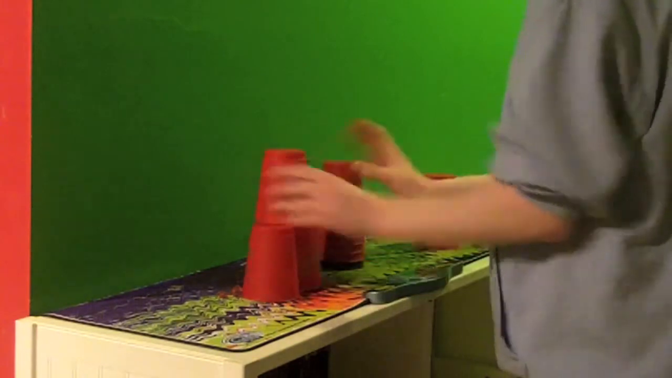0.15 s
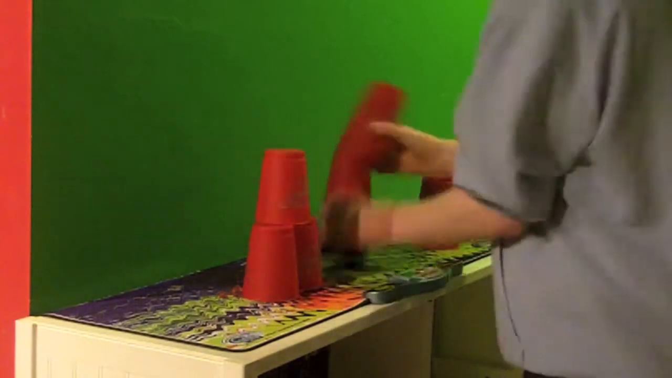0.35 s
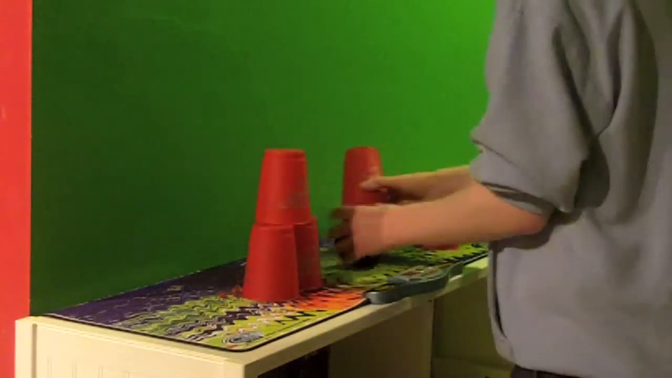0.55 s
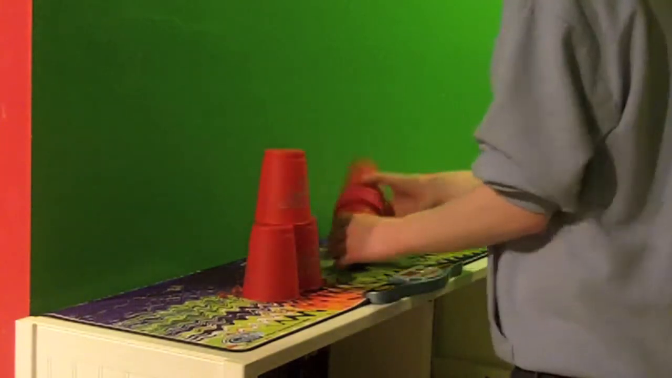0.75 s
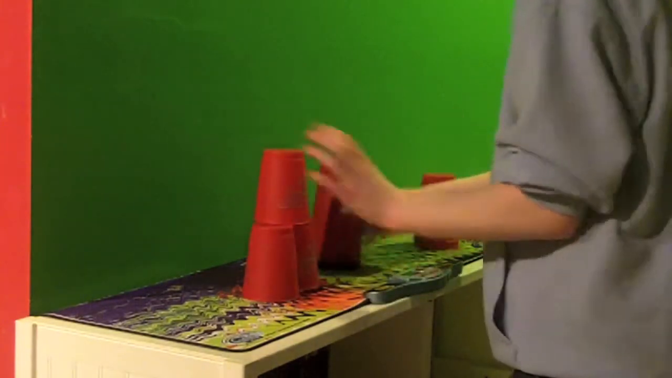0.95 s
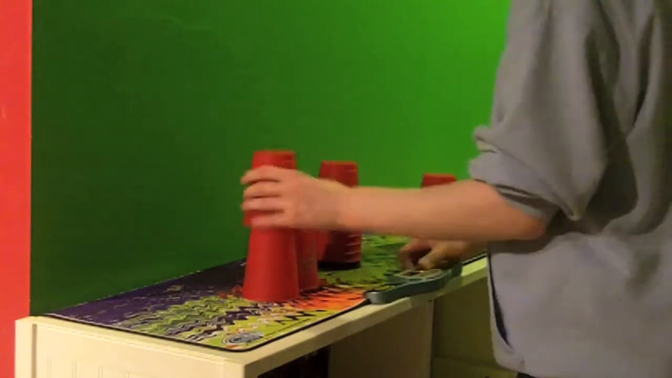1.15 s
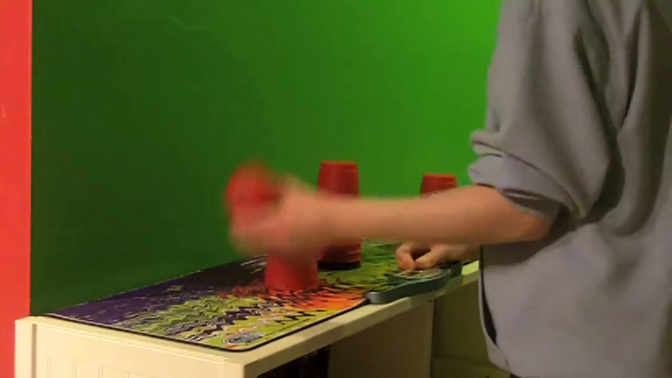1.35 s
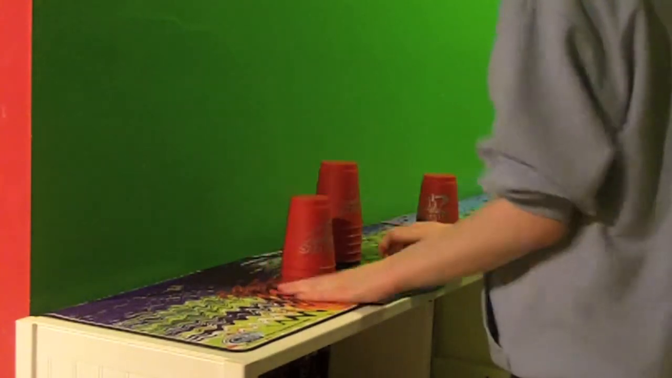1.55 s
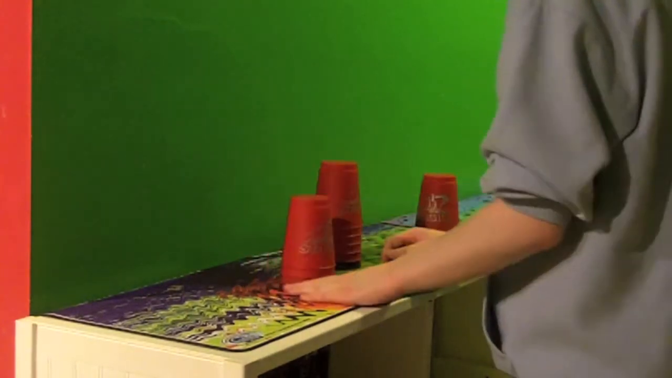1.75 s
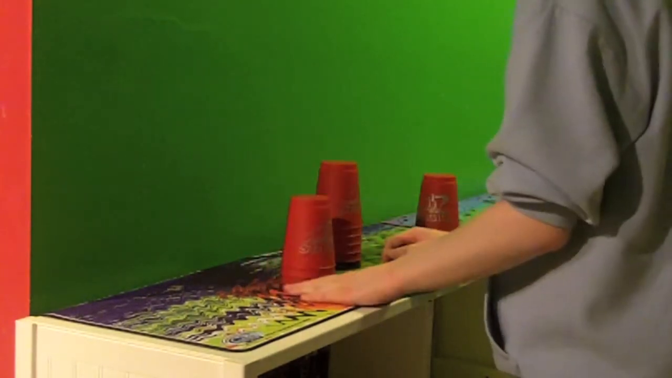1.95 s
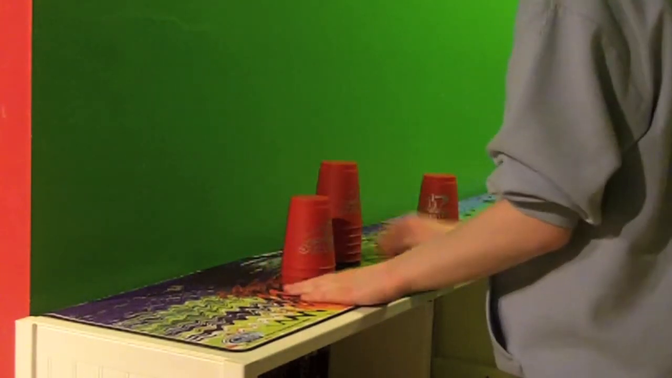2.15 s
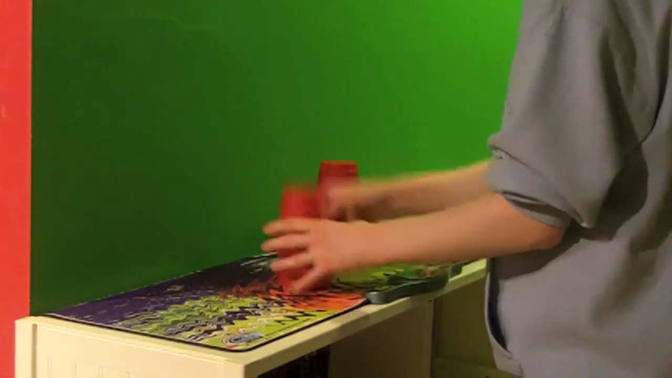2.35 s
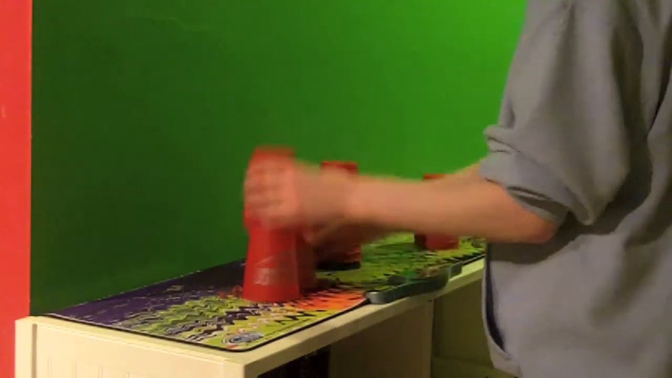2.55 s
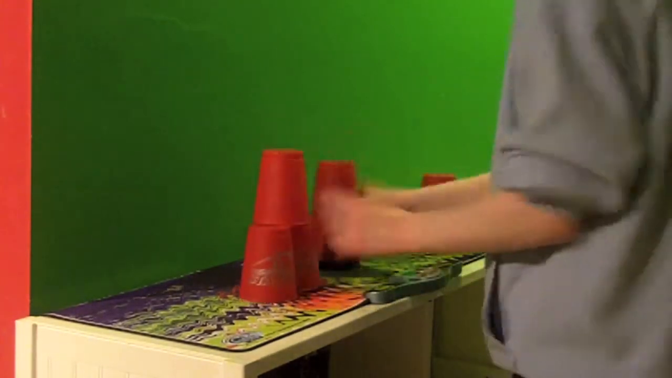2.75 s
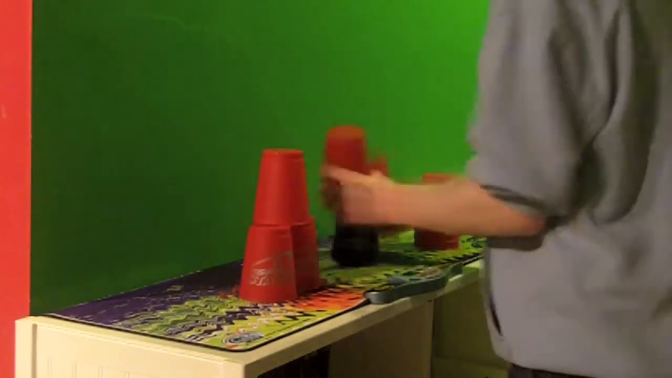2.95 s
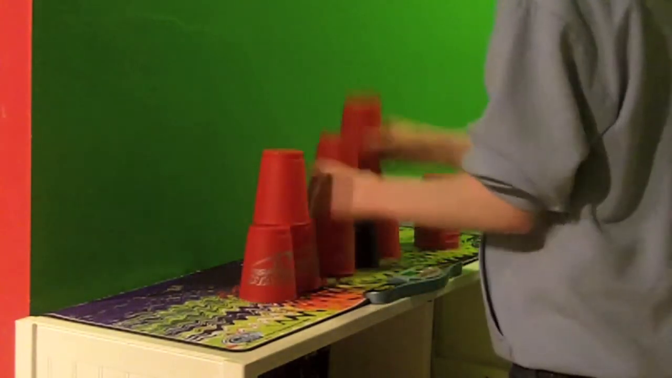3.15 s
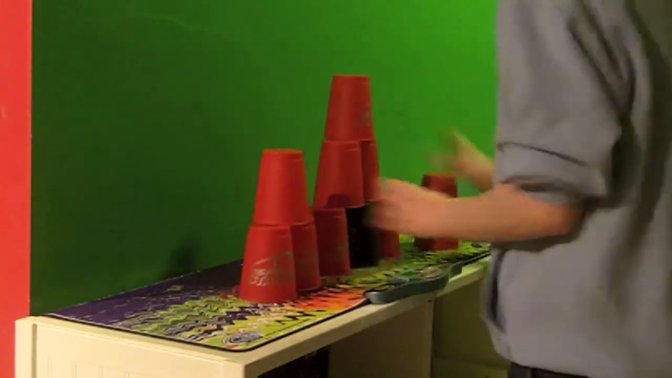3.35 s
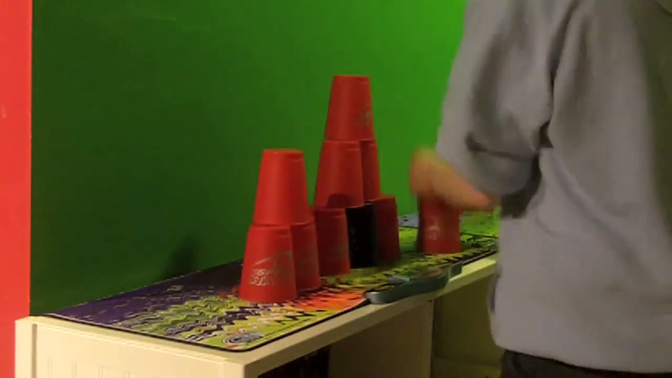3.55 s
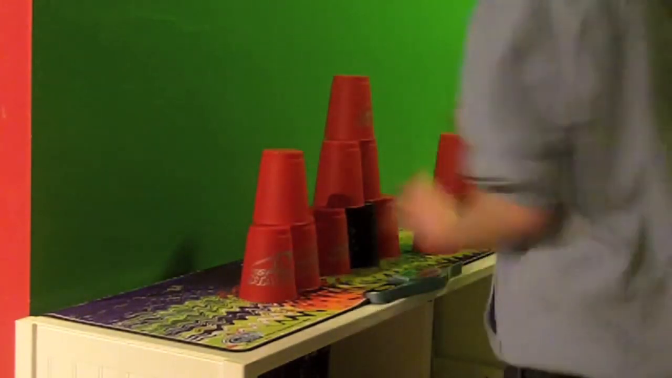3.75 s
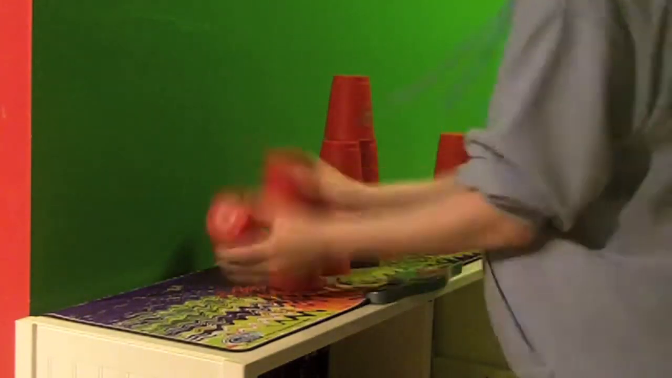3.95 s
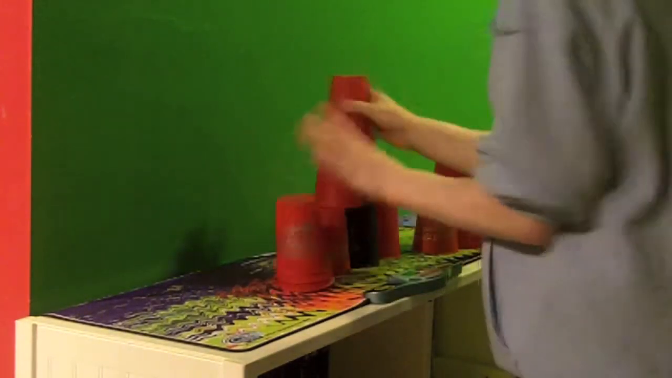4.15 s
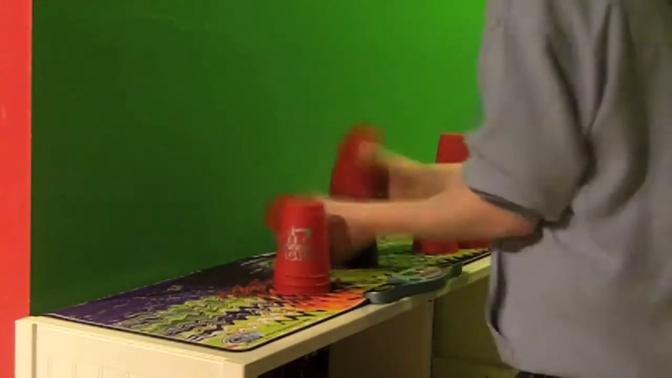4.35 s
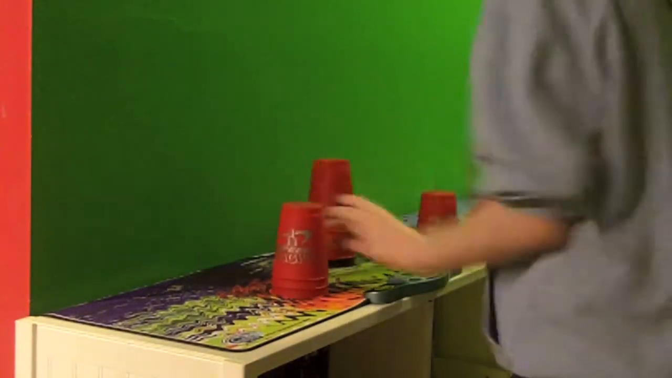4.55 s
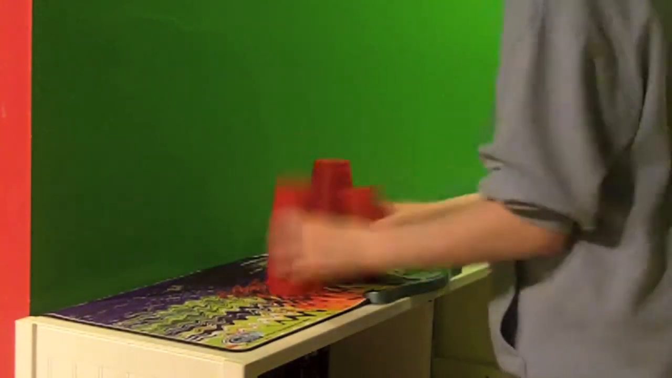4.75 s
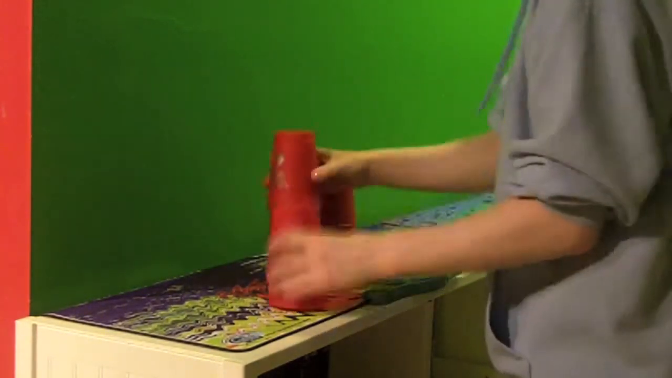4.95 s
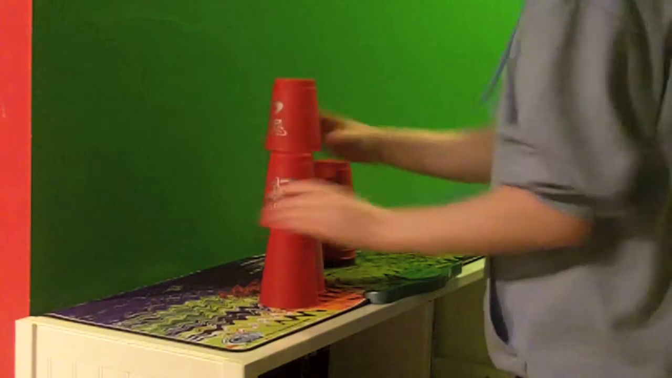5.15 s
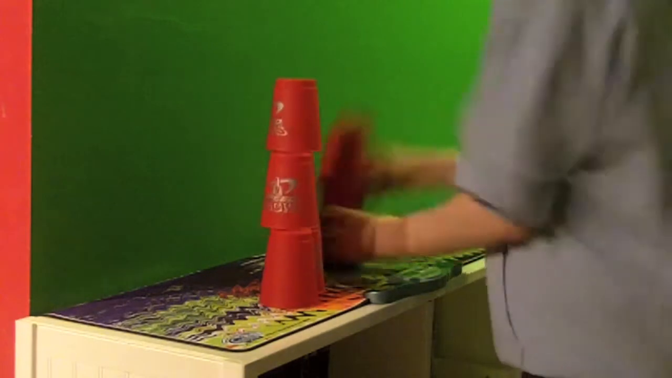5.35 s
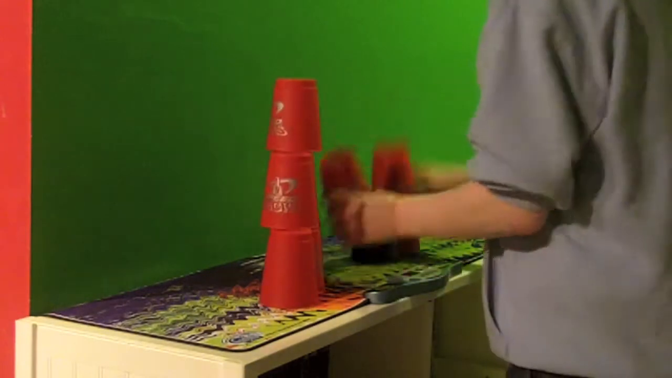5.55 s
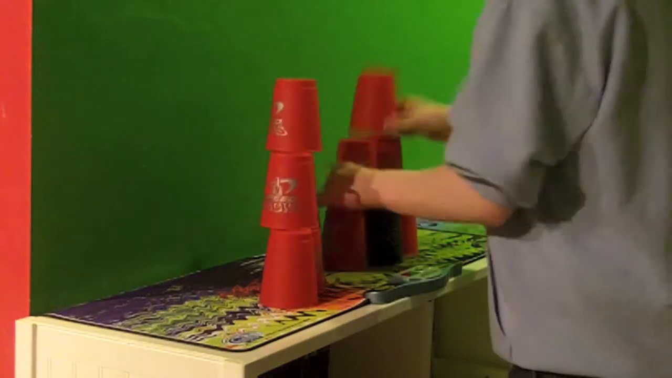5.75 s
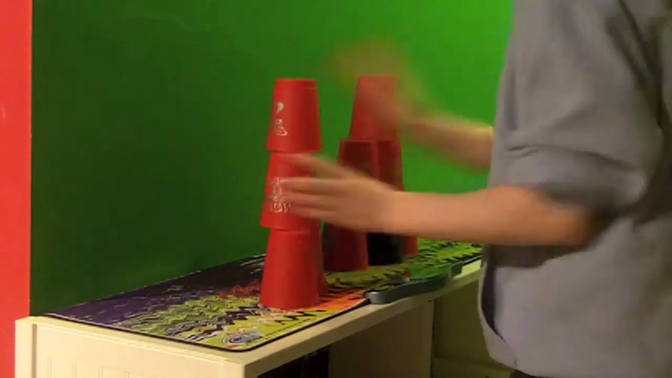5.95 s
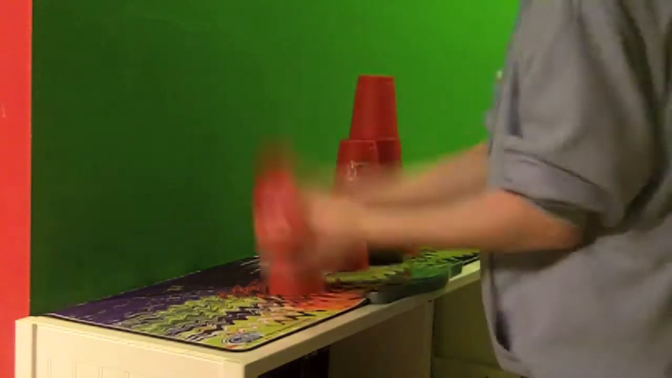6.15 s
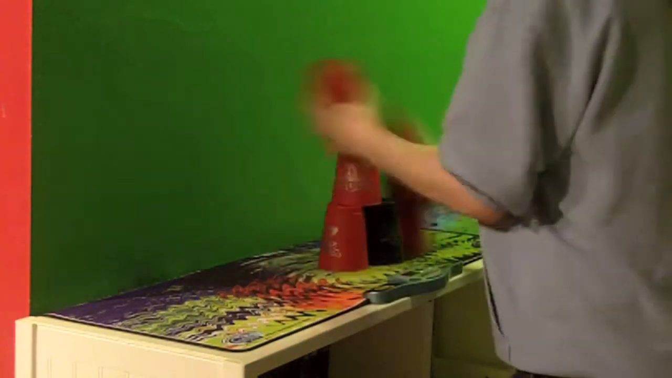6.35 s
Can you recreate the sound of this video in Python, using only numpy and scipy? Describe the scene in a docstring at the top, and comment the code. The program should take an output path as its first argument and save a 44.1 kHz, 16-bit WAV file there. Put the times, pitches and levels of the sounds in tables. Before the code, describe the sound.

Lightweight plastic cups are speed-stacked on a cabinet with a soft mat. Hollow pops and quick clacks begin at once, with short rubbing slides as cups nest. Hands bump the top dully, then there is a near-silent pause around two seconds before denser clatter resumes and runs to the end. Close, dry small room, mono camera microphone, faint low rumble.

```python
"""A short scrape of plastic and a burst of hollow pops come first: light cups are stacked fast on a matted cabinet top.
Each contact is a rattle of touches exciting resonators: the top thuds, the cup's air pops, its shell clacks, its rim ticks.
Nested cups rustle as they slide, by shaped noise, and the air gap between them rings as a gliding narrow band.
Hands brush and tick on the plastic; now and then they come down and the cabinet sways by a decaying sine.
A small room adds decaying noise as reverberation; under it lie a low rumble and a thin electrical whine."""
import sys
import numpy as np
from scipy import signal
from scipy.fft import rfft, irfft
from scipy.io import wavfile
from scipy.ndimage import uniform_filter1d

SR = 44100
rng = np.random.default_rng(int(sys.argv[2]) if len(sys.argv) > 2 else 0)


def store_pcm(level_fs):
    """Save levels as 16-bit WAV."""
    pcm = np.round(np.clip(level_fs, -1, 1) * 32767).astype(np.int16)
    wavfile.write(sys.argv[1], SR, np.atleast_2d(pcm).T)


N = 286209   # samples in the scene

# Noise of the still room. Each row: frequency in Hz, relative level in dB per Hz.
ROOM_AIR_SPECTRUM = [(25, -2), (45, -6), (70, -26), (130, -31), (250, -25.5), (450, -35), (900, -42),
                     (3000, -50.5), (8000, -56.5), (15000, -55)]
# Reverberation of the room. Each row: frequency in Hz, time to fall by 60 dB in s.
ROOM_DECAY = [(100, 0.33), (400, 0.26), (1000, 0.33), (2000, 0.25), (6000, 0.2), (14000, 0.068)]
# Sleeves and fingers on the move. Each row: time in seconds, rustle level in dB.
HANDLING_LEVELS = [(1.6, -53), (1.75, -70), (2.3, -93), (2.38, -59), (3.1, -50), (3.35, -59), (3.85, -58),
                   (3.95, -42), (4.5, -46), (5.0, -56.5), (5.28, -63.5), (5.4, -51.5)]
# Plastic rubbing on plastic. Each row: frequency in Hz, relative level in dB per Hz.
RUB_SPECTRUM = [(120, -15.5), (300, -15), (600, 13.5), (1600, 7), (3000, 0.5), (4300, 2), (6600, 5),
                (8200, -2), (10000, -9), (15000, -29)]
# Hands come down and set the cabinet swaying. Each row: start in seconds, level in dB.
HAND_PRESSES = [(0.463, -33), (1.145, -38), (1.575, -30), (2.201, -45)]
# Deep modes of the cabinet's panels. Each row: frequency in Hz, relative level in dB.
PANEL_MODES = [(50, 1), (70, 0.5), (122, -7.5), (151, 3.5), (180, -0.5), (215, 4)]
# Modes of the cabinet top under the mat. Each row: frequency in Hz, relative level in dB.
TOP_MODES = [(255, -11), (289, -5), (336, 0), (390, -7), (441, -2.5), (480, 3.5), (530, 5.5)]
# Modes of the air cavity and wall of the cups. Each row: frequency in Hz, relative level in dB.
CUP_MODES = [(600, 3), (641, 4.5), (700, -1), (759, -4), (813, -4.5), (883, 1), (922, -5.5), (985, 1),
             (1044, 4), (1120, 3.5), (1200, 0.5), (1280, 0), (1420, -8.5), (1500, -8), (1582, -10.5),
             (1675, -7), (1755, -15.5), (1825, -7), (1927, -8.5), (2080, -2), (2229, 1), (2400, 5.5),
             (2600, 4)]
# Crowded upper modes of the rim. Each row: frequency in Hz, relative level in dB per Hz.
RIM_SPECTRUM = [(1800, -12.5), (2700, 5.5), (4300, 3), (6600, 5), (8000, -1.5), (10000, -10),
                (12500, -24.5), (15000, -23)]
# The air between two nested cups rings, sinking as they part and rising as they close.
# Each row: start in seconds, length in s, level at the highest pitch in dB, start pitch in Hz, end pitch in Hz.
GAP_GLIDES = [(0.622, 0.063, -28, 1505, 1143), (0.85, .06, -28, 1369, 1030),
              (1.272, 0.038, -23.5, 1870, 1686), (1.42, 0.01, -20.5, 1687, 1830),
              (2.427, 0.037, -41, 1746, 1400), (2.848, 0.041, -37, 1730, 1285),
              (3.495, 0.031, -32, 1750, 1440), (4.015, 0.028, -23, 1190, 1900),
              (4.363, 0.012, -22, 1575, 1840), (4.51, 0.014, -25.5, 1660, 1820),
              (4.883, 0.011, -32.5, 1550, 1740), (6.098, .024, -59, 1360, 1830)]
# Cups are drawn along each other. Each row: start in seconds, end in seconds, rustle level in dB.
DRAWN_CUPS = [(0, 0.038, -42.5), (0.286, 0.338, -38), (0.349, 0.405, -42), (0.681, 0.78, -39.5),
              (1.141, 1.259, -34.5), (2.132, 2.175, -52), (2.341, 2.413, -46.5), (2.492, 2.58, -38),
              (2.803, 2.865, -39), (3.442, 3.485, -42), (3.898, 3.981, -38), (4.163, 4.244, -49),
              (4.513, 4.572, -55), (4.796, 4.95, -57), (4.964, 5.025, -39), (5.39, 5.431, -46.5),
              (6.272, 6.394, -39)]
# Fingers take hold of a stack and jostle it.
# Each row: start in seconds, hollow pop in dB, hardness (clack over pop) in dB.
GRABBED_STACKS = [(.253, -30.5, -15), (.383, -27.5, -14), (.6893, -41, -8.5), (.8098, -43, -1),
                  (.927, -36.5, -18), (1.438, -32, -7), (1.5586, -29.5, -15), (1.846, -71, -6),
                  (2.178, -52, -11), (2.215, -53, -23), (2.3534, -37.5, -17), (2.433, -44.5, -10),
                  (2.8495, -34, -5.5), (2.8966, -32.5, -10.5), (2.946, -51, 4), (3.4178, -27.5, -14.5),
                  (4.399, -34.5, -7), (4.456, -29.5, -14), (4.7363, -31.5, -13), (5.0204, -35.5, -15),
                  (5.309, -36, -14), (5.3657, -31.5, -15), (5.443, -29, -12.5), (5.685, -28.5, -20),
                  (6.313, -28, -11)]
# A cup is set down on the mat or on other cups.
# Each row: start in seconds, rattle length in s, hollow pop in dB, pop pitch in Hz, hardness (clack over pop) in dB.
CUP_LANDINGS = [(0.019, 0.011, -36, 596, -13), (0.038, 0.02, -16.5, 710, -24.5),
                (0.0595, 0.01, -22.5, 666, -34), (0.112, 0, -10, 863, -10), (1.1172, .032, -23, 830, -17),
                (1.155, 0.047, -22.5, 850, -24), (2.568, 0.027, -17, 730, -27),
                (2.6166, 0.0091, -12, 870, -13), (2.623, 0.016, -12, 860, -20.5),
                (2.781, 0.024, -26, 746, -12.5), (3.002, 0.0067, -18, 746, -15),
                (3.0955, 0.018, -21.5, 730, -13.5), (3.1187, 0.0013, -19.5, 700, -29),
                (3.1493, 0.019, -21, 890, -15.5), (3.184, 0.029, -18, 830, -27.5),
                (3.2332, 0.016, -9, 730, -13), (3.245, 0.028, -10, 940, -14.5),
                (3.6059, 0.0035, -9, 843, -26.5), (3.6178, .002, -9.5, 730, -41),
                (3.663, 0.00056, -9.5, 910, -15.5), (3.8976, 0.0037, -27.5, 860, -19),
                (3.9086, .015, -18, 835, -22), (3.965, .015, -20.5, 815, -18),
                (4.1617, 0.017, -23.5, 960, -13.5), (4.1796, .002, -16.5, 930, -25),
                (4.235, 0.011, -15.5, 940, -9.5), (4.5515, .019, -25, 830, -10),
                (4.6705, 0.019, -20.5, 820, -7), (4.9667, .028, -21, 724, -18.5),
                (5.0832, .016, -16, 810, -22), (5.1167, 0, -9.5, 1080, -13), (5.54, .011, -13, 710, -20),
                (5.7111, 0.006, -17.5, 854, -21), (5.745, 0.036, -19, 935, -23),
                (5.792, 0.012, -12.5, 746, -15), (5.8197, 0.0057, -7.5, 870, -15.5),
                (6.021, 0.0043, -20, 910, -18), (6.029, .012, -9.5, 840, -17)]
# A cup slides into another and rams home.
# Each row: start in seconds, rattle length in s, shell clack in dB, cabinet thud in dB, rustle of the slide in dB.
CUP_NESTINGS = [(0.3312, 0.014, -26.5, -34, -43), (.418, 0, -18, -27.5, -29),
                (0.4483, 0.008, -24.5, -25.5, -53), (0.471, 0.0000086, -20, -18.5, -50),
                (0.6244, 0.0064, -30, -42, -71), (0.852, 0.018, -34, -35.5, -58),
                (.973, 0.0053, -18.5, -26.5, -49), (1.204, 0.0079, -29, -28.5, -55),
                (1.274, 0.0017, -13.5, -35, -56), (1.4209, 0.0053, -34.5, -49, -66),
                (1.4982, 0.0027, -29.5, -26, -47), (1.505, 0, -16, -34.5, -56),
                (3.016, .003, -22.5, -29, -54), (3.5015, 0.02, -38, -33.5, -56),
                (3.608, .008, -21, -48, -80), (4.0027, 0, -32.5, -29, -42), (4.03, 0.011, -27.5, -30, -40),
                (4.054, .009, -24.5, -33, -40), (4.077, .009, -36, -32, -28),
                (4.2563, .0016, -16.5, -42, -38), (4.27, 0.016, -31, -17.5, -53),
                (4.2912, 0.0017, -17, -24.5, -48), (4.3655, 0, -24, -40, -62),
                (4.515, .001, -37.5, -26.5, -44), (4.582, 0.0059, -21, -30.5, -37),
                (6.0824, 0.052, -34, -23, -56), (6.1198, 0, -12, -21, -24.5), (6.139, 0, -27, -23, -48),
                (6.1408, 0.0086, -15.5, -34, -34), (6.2586, 0.0056, -20, -27, -41),
                (6.37, 0.048, -27, -27, -38), (6.405, 0.009, -39.5, -18, -36.5),
                (6.432, 0.018, -25.5, -33, -30.5), (6.467, 0.00071, -17, -29.5, -42)]

HIT_SIZE = 5292   # samples given to one contact
CONTACTS_PER_S = 450   # touches in a rattle
# Times to fall by 60 dB, in s
TOP_T60_S, PANEL_T60_S, POP_T60_S, CLACK_T60_S, TICK_T60_S = 0.094, 0.18, 0.084, 0.04, 0.046

# Fingertip ticks: rate, then level and spread in dB relative to the handling rustle
TICKS_PER_S, TICKS_DB, TICKS_SPREAD_DB = 66, -6.5, 9
# The air gap rings lower while a cup is pushed in
SLIDE_S, SLIDE_GAP_HZ, DRAW_GAP_HZ = 0.075, 2940, 6940
GRAB_RATTLE_S, GRAB_POP_HZ = 0.017, 783

# A landing's thud grows less than its pop: dB at a pop of 0 dB, dB per dB, most dB over the pop
THUD_DB, THUD_SHARE, THUD_MOST_DB = -10.5, 0.67, 1
THUD_DB_PER_OCTAVE = -7   # a cup flat on the mat pops lower and thuds more than one set on other cups
# Tick in dB at a clack of 0 dB, then dB per dB
LANDING_CLACK_HZ, LANDING_TICK_DB, LANDING_TICK_SHARE = 1797, -7.0, 0.78
CLACK_SLOPE = -0.44   # octaves of clack per octave of pop: cups set high on a stack clack lower
NEST_POP_HZ, NEST_CLACK_HZ = 807, 1635
NEST_POP_DB, NEST_POP_SHARE = 3.0, 0.53   # pop over a blend of thud and clack; the thud's share in it
NEST_TICK_DB, NEST_TICK_SHARE = -10.5, 0.83   # tick in dB at a clack of 0 dB, dB per dB


def from_db(db):
    """Level to amplitude: twenty decibels are a factor of ten."""
    return 10 ** (np.asarray(db) / 20)


def rms_one(x):
    """Scale to unit mean power."""
    return x / np.sqrt(np.mean(x ** 2) + 1e-20)


def unit_energy(x):
    """Scale to unit total energy."""
    return x / np.sqrt(np.sum(x ** 2) + 1e-20)


def at_hz(points, hz):
    """Interpolate a table over log frequency, the axis on which octaves are equal."""
    known_hz, values = np.transpose(points)
    return np.interp(np.log(np.maximum(hz, 1)), np.log(known_hz), values)


def noise(spectrum, size):
    """Spectral shaping: white noise weighted by a spectrum, at rms 1."""
    hz = np.fft.rfftfreq(size, 1 / SR)
    shaped = rfft(rng.standard_normal(size)) * from_db(at_hz(spectrum, hz))
    return rms_one(irfft(shaped, size))


def dying(t60, size):
    """Exponential decay from 1, as in a linearly damped resonator."""
    return np.exp(-np.log(1000) * np.arange(size) / SR / t60)


def passed(x, kind, hz, order=2):
    """A gentle low-, high- or band-pass of Butterworth form."""
    sections = signal.butter(order, np.clip(hz, 10, SR * 0.45), kind, fs=SR, output="sos")
    return signal.sosfilt(sections, x)


def add(track, s, sound):
    """Superposition: mix a sound into a track from a given time."""
    start = max(round(s * SR), 0)
    track[start:start + len(sound)] += sound[:len(track) - start]


def struck(touches, response):
    """Linear response: a train of touches convolved with what one touch gives out."""
    return signal.fftconvolve(touches, response)[:len(touches)]


def narrow_band(phase, bandwidth_hz):
    """Quadrature modulation: two slow noises on a carrier make a fluttering narrow band at rms 1."""
    flutter = passed(rng.standard_normal((2, len(phase))), "low", bandwidth_hz / 2)
    return rms_one(flutter[0] * np.cos(phase) + flutter[1] * np.sin(phase))


def background(air_db=-49.5, whine_hz=7865, whine_db=-85.5):
    """Stationary sources: shaped noise for the low room rumble, one sine for a thin electrical whine."""
    whine = np.sqrt(2) * np.sin(2 * np.pi * whine_hz * np.arange(N) / SR)
    return from_db(air_db) * noise(ROOM_AIR_SPECTRUM, N) + from_db(whine_db) * whine


def handling(stir_db=3.0, stir_s=0.011):
    """Friction noise: sleeves and fingers brush the cups, with a level that stirs at random."""
    t = np.arange(N) / SR
    moves = np.arange(0, N / SR, stir_s)
    stir = np.interp(t, moves, rng.standard_normal(len(moves)))
    level_db = np.interp(t, *np.transpose(HANDLING_LEVELS)) + stir_db * stir
    return from_db(level_db) * noise(RUB_SPECTRUM, N)


def fingertips(t60=0.033):
    """A Poisson-like train of impulses: fingertips tick at random, louder as the hands are busier."""
    happens = rng.random(N) < TICKS_PER_S / SR
    sizes = happens * from_db(TICKS_SPREAD_DB * np.clip(rng.standard_normal(N), -2, 2))
    tick = noise(RUB_SPECTRUM, HIT_SIZE) * dying(t60, HIT_SIZE)
    ticks = rms_one(struck(sizes, tick))
    busy_db = np.interp(np.arange(N) / SR, *np.transpose(HANDLING_LEVELS))
    return from_db(busy_db + TICKS_DB) * ticks


def ring(modes, t60, detune, centre_hz=1, focus_db=0):
    """Modal synthesis: struck modes weaken by focus_db an octave from the centre, and vary at every blow."""
    hz, level_db = np.transpose(modes)
    focused_db = level_db - focus_db * abs(np.log2(hz / centre_hz))
    strength = from_db(focused_db + 2 * rng.standard_normal(len(hz)))
    strength = strength * rng.choice([-1, 1], len(hz))
    hz = hz * (1 + detune * rng.standard_normal(len(hz)))   # each blow detunes the modes slightly at random
    sines = np.sin(2 * np.pi * np.outer(hz, np.arange(HIT_SIZE) / SR))
    modal = strength @ sines * dying(t60, HIT_SIZE)
    return passed(modal, "high", hz[0] / 2)   # little is radiated below the lowest mode


def cabinet_sway(sway_hz=28.6, t60=1.0, bump_t60=0.18, press_s=0.02):
    """A damped oscillator under a soft push: the hands bump dully and the whole cabinet rocks."""
    out, t = np.zeros(N), np.arange(SR) / SR
    press = 1 - np.exp(-t / press_s)
    for s, level_db in HAND_PRESSES:
        panels = ring(PANEL_MODES, bump_t60, detune=0.043, focus_db=4.0)
        bump = rms_one(press[:HIT_SIZE] * panels)
        rocking = press * np.sin(2 * np.pi * sway_hz * t) * dying(t60, SR)
        add(out, s, from_db(level_db) * rocking)
        add(out, s, from_db(level_db) / 2 * bump)
    return out


def gap_tones(width_hz=360, narrow_db=22.5, edge_s=0.00433, size=8192):
    """Cavity resonance driven by rubbing: a narrower gap rings higher and louder (narrow_db an octave)."""
    out, t = np.zeros(N), np.arange(size) / SR
    for s, length_s, level_db, start_hz, end_hz in GAP_GLIDES:
        hz = start_hz * (end_hz / start_hz) ** np.minimum(t / length_s, 1)
        tone = narrow_band(2 * np.pi * np.cumsum(hz) / SR, width_hz)
        contact = np.clip(np.minimum(t, length_s - t) / edge_s, 0, 1)
        loudness = from_db(level_db + narrow_db * np.log2(hz / hz.max()))
        add(out, s, contact * loudness * tone)
    return out


def strokes():
    """Sliding contacts: each nesting is led in by a short slide; cups drawn along each other hiss higher."""
    slides = [(s - SLIDE_S, s, level_db, SLIDE_GAP_HZ) for s, *_, level_db in CUP_NESTINGS]
    draws = [(start, end, level_db, DRAW_GAP_HZ) for start, end, level_db in DRAWN_CUPS]
    return slides + draws


def sliding(swell_db=15.5, catch_db=7.5, catch_s=0.007, gap_db=-6.5, gap_width=0.13, glide=0.18,
            edge_s=0.0014, size=8192):
    """Uneven friction: cup walls rub harder through each stroke; the shrinking air gap rises in pitch."""
    out, t = np.zeros(N), np.arange(size) / SR
    for start, end, level_db, gap_hz in strokes():
        length = max(end - start, edge_s)
        progress = np.minimum(t / length, 1)
        phase = 2 * np.pi * np.cumsum(gap_hz * (1 + glide * (progress - 0.5))) / SR
        gap = narrow_band(phase, gap_hz * gap_width)
        catches = np.interp(t / catch_s, np.arange(size), rng.standard_normal(size))
        contact = np.clip(np.minimum(t, length - t) / edge_s, 0, 1)
        effort = contact * from_db(level_db + swell_db * (progress - 1) + catch_db * catches)
        add(out, start, effort * (noise(RUB_SPECTRUM, size) + from_db(gap_db) * gap))
    return out


def landing(s, rattle_s, pop_db, pop_hz, hardness_db):
    """Contact stiffness: air pops and top thuds together; a harder contact brings out shell and rim."""
    octaves = np.log2(pop_hz / GRAB_POP_HZ)
    thud_db = min(THUD_DB + THUD_SHARE * pop_db, pop_db + THUD_MOST_DB)
    thud_db += THUD_DB_PER_OCTAVE * octaves
    clack_db = pop_db + hardness_db
    clack_hz = LANDING_CLACK_HZ * 2 ** (CLACK_SLOPE * octaves)
    tick_db = LANDING_TICK_DB + LANDING_TICK_SHARE * clack_db
    return s, rattle_s, thud_db, pop_db, pop_hz, clack_db, clack_hz, tick_db


def nesting(s, rattle_s, clack_db, thud_db):
    """Shared excitation: shell and rim sound together; the air pops more when the stack stands on the mat."""
    pop_db = NEST_POP_DB + NEST_POP_SHARE * thud_db + (1 - NEST_POP_SHARE) * clack_db
    tick_db = NEST_TICK_DB + NEST_TICK_SHARE * clack_db
    return s, rattle_s, thud_db, pop_db, NEST_POP_HZ, clack_db, NEST_CLACK_HZ, tick_db


def contacts():
    """All impacts in order of time; a jostled stack settles like a light, loose landing."""
    landings = [landing(*row) for row in CUP_LANDINGS]
    nestings = [nesting(*row[:-1]) for row in CUP_NESTINGS]
    grabs = [landing(s, GRAB_RATTLE_S, pop_db, GRAB_POP_HZ, hardness_db)
             for s, pop_db, hardness_db in GRABBED_STACKS]
    return sorted(landings + nestings + grabs)


def rattle(length_s, fade_db=2.5, later_db=-8.5, uneven_db=6.5, count=24):
    """Repeated impact: a first touch, then uneven touches, lighter on average, as the rim settles."""
    when = rng.random(count)   # as a fraction of the rattle
    size, sign = rng.standard_normal(count), rng.choice([-1, 1], count)
    heard = np.arange(count) < length_s * CONTACTS_PER_S
    strength = from_db(later_db - fade_db * when + uneven_db * size)
    clicks = np.zeros(HIT_SIZE)
    np.add.at(clicks, (when * length_s * SR).astype(int), heard * sign * strength)
    clicks[0] += 1
    return clicks


def cup_ring(touches, centre_hz, t60, focus_db, spread):
    """Modes within a ratio of one pitch; a finite contact time keeps the higher ones quiet."""
    modal = ring(CUP_MODES, t60, detune=0.02, centre_hz=centre_hz, focus_db=focus_db)
    return passed(struck(touches, modal), "band", [centre_hz / spread, centre_hz * spread])


def rim_tick(touches, crack_db=-3.5, crack_t60=0.0035, top_hz=11500):
    """High modal density acts as noise: each touch adds the power of a sharp crack and a short ring."""
    shape = dying(TICK_T60_S, HIT_SIZE) + from_db(crack_db) * dying(crack_t60, HIT_SIZE)
    envelope = np.sqrt(abs(struck(touches ** 2, shape ** 2)))
    return passed(noise(RIM_SPECTRUM, HIT_SIZE) * envelope, "low", top_hz, order=3)


def snap(t60=0.011):
    """A very short contact has a very bright spectrum: differenced noise that dies at once."""
    return np.diff(rng.standard_normal(HIT_SIZE + 1)) * dying(t60, HIT_SIZE)


def cups(snap_db=-6.5, panel_db=-30.5, panel_share=0.42):
    """Coupled resonators: rattles drive top, cavity, shell and rim; contacts take six spots in turn."""
    spots = np.zeros((6, N))
    level_span = np.sqrt(SR / 100)   # levels are rms over a hundredth of a second
    for k, contact in enumerate(contacts()):
        s, rattle_s, thud_db, pop_db, pop_hz, clack_db, clack_hz, tick_db = contact
        touches = rattle(rattle_s)
        thud = struck(touches, ring(TOP_MODES, TOP_T60_S, detune=0.03))
        panels = ring(PANEL_MODES, PANEL_T60_S, detune=0.041)
        pop = cup_ring(touches, pop_hz, POP_T60_S, focus_db=22.5, spread=1.53)
        clack = cup_ring(touches, clack_hz, CLACK_T60_S, focus_db=11.5, spread=1.202)
        parts = [(thud_db, thud),
                 (panel_db + panel_share * thud_db, panels),   # the mat evens out the push on the panels
                 (pop_db, pop),
                 (clack_db, clack),
                 (tick_db, rim_tick(touches)),
                 (snap_db + 2 * clack_db, snap())]   # only the hardest contacts are short enough to snap
        for level_db, sound in parts:
            add(spots[k % len(spots)], s, from_db(level_db) * level_span * unit_energy(sound))
    return spots


def evened(response, width_hz=45):
    """Minimum-phase equalisation by cepstrum: removes broad humps causally and keeps the fine ripple."""
    size = 2 * len(response)
    spectrum = rfft(response, size)
    power = uniform_filter1d(abs(spectrum) ** 2, max(round(width_hz * size / SR), 1))
    cepstrum = irfft(np.log(np.maximum(power / np.median(power), 1e-6)))[:len(response)]
    cepstrum[0] /= 2
    # The causal half of a log-power cepstrum gives the log amplitude with its minimum phase.
    return irfft(spectrum * np.exp(-rfft(cepstrum, size)))[:len(response)]


def room(x, wet_db=-5.5, first_echo_s=0.003, size=22050):
    """Reverberation: direct sound, then dense reflections as bands of noise, each with its own decay."""
    edges = np.geomspace(50, 18000, num=10)   # Hz
    response = np.zeros(size)
    response[0] = 1
    for low, high in zip(edges, edges[1:]):
        decay = dying(at_hz(ROOM_DECAY, np.sqrt(low * high)), size)
        band = passed(rng.standard_normal(size), "band", [low, high]) * decay
        bandwidth_share = np.sqrt(2 * (high - low) / SR)
        add(response, first_echo_s, from_db(wet_db) * unit_energy(band) * bandwidth_share)
    return signal.fftconvolve(x, evened(response))[:N]


def scene():
    """Superposition: each spot has its own pattern of reflections; both channels carry the same sound."""
    rustle = sliding() + gap_tones() + handling() + fingertips()
    in_room = sum(room(source) for source in [*cups(), rustle])
    mono = in_room + cabinet_sway() + background()
    return np.array([mono, mono])


def record(dry, notch_hz=5480, notch_width_hz=1000, offset=0.024, cutoff_hz=15100):
    """Transduction by a camera: a treble notch, soft saturation of peaks, a cut top and a small offset."""
    notch = signal.iirnotch(notch_hz, notch_hz / notch_width_hz, fs=SR)
    notched = signal.lfilter(*notch, dry)
    rounded = notched / (1 + notched ** 12) ** (1 / 12)
    top_cut = signal.ellip(10, 0.1, 80, cutoff_hz, fs=SR, output="sos")
    return offset + signal.sosfilt(top_cut, rounded)


dry = scene()
out = record(dry)
store_pcm(out)
```